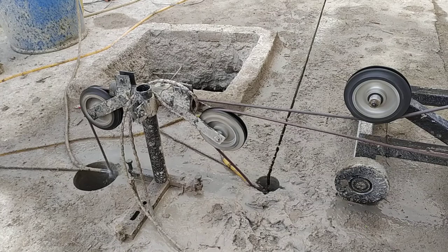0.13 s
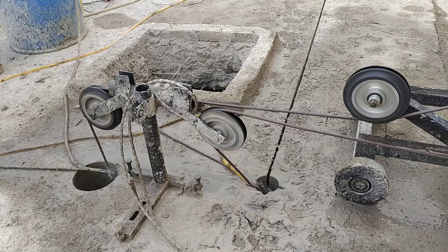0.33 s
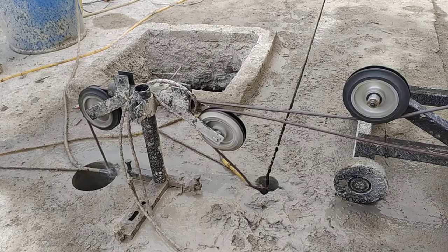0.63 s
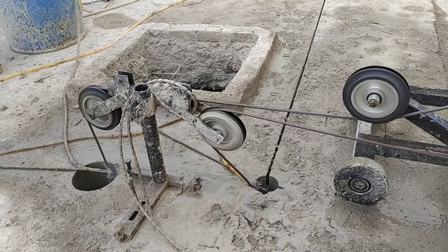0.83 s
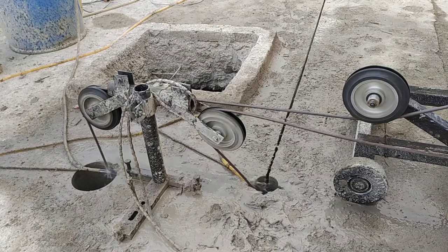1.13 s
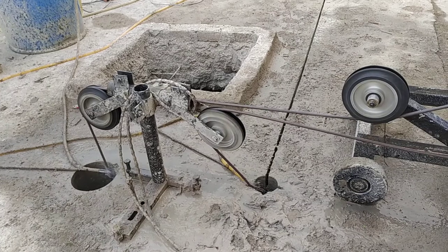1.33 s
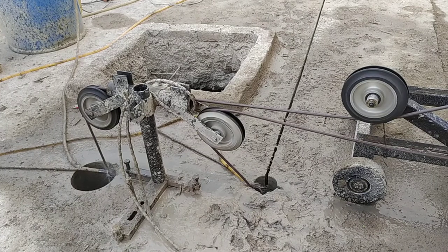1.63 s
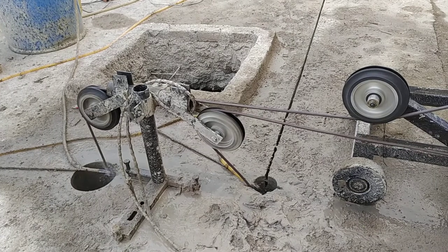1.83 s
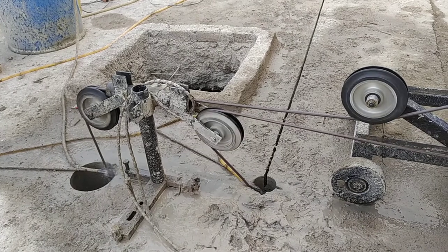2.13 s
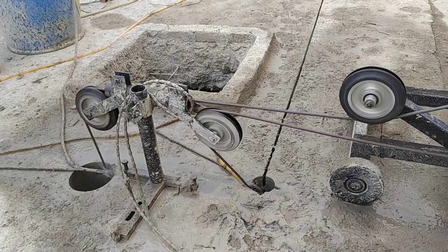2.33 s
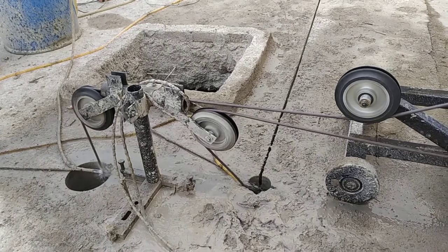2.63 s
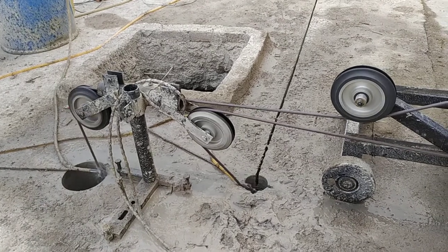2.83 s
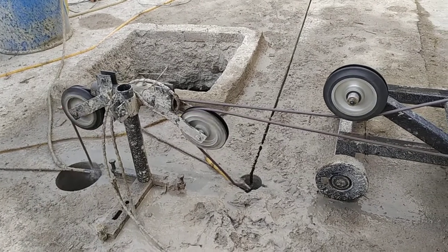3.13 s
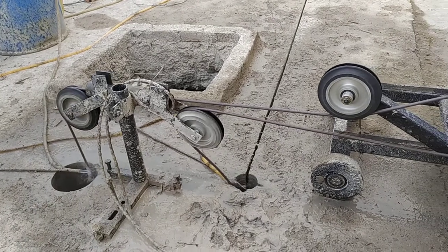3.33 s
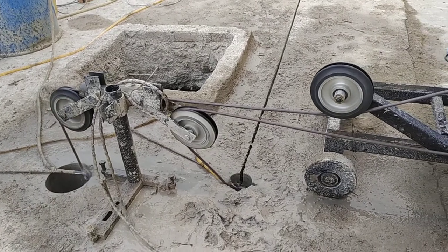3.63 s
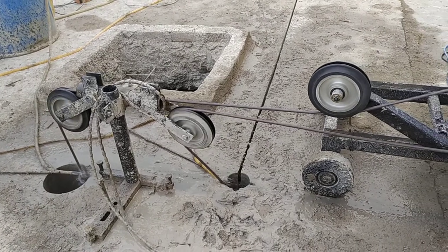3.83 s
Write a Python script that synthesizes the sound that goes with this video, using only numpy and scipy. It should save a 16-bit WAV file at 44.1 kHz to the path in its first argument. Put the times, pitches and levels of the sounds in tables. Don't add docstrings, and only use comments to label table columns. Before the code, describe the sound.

Harsh continuous concrete sawing: bright gritty wire friction, fast hollow knocking, faint whine, after brief silence.

```python
import sys
import numpy as np
from scipy import signal
from scipy.fft import rfft, irfft
from scipy.io import wavfile
from scipy.ndimage import uniform_filter1d

SR = 44100
rng = np.random.default_rng(int(sys.argv[2]) if len(sys.argv) > 2 else 0)


def to_wav(sig):
    pcm = np.clip(np.atleast_2d(sig), -1, 1) * 32767
    pcm = np.round(pcm).astype(np.int16)
    wavfile.write(sys.argv[1], SR, pcm.T)


def invert_db(level):
    return 10 ** (np.asarray(level, dtype=float) / 20)


N = 176400
T = np.arange(N) / SR
F = np.maximum(np.arange(N // 2 + 1) * SR / N, 1.)


def col(table, k):
    points = np.array(table, float)
    return np.interp(T, points[:, 0], points[:, k])


def level(x, db):
    return x * invert_db(db) / np.sqrt(np.mean(x ** 2))


def ring(x, hz, width):
    return signal.lfilter(*signal.iirpeak(hz, hz / width, fs=SR), x)


def lowpass(x, hz, order):
    return signal.lfilter(*signal.butter(order, hz, fs=SR), x)


def walk(rate):
    hold = int(SR / rate)
    steps = np.repeat(rng.standard_normal(N // hold + 1), hold)
    return 1.262 * uniform_filter1d(uniform_filter1d(steps, hold), hold)[:N]


START_S = .3765


def thump():
    since = np.clip(T - START_S, 0, 9)
    return -.09 * np.exp(-since / 0.055) * np.array([[1], [.04]])


# time in seconds, speed in turns per second.
PULLEY_SPEED = [(0, 15.14), (1.93, 15.14), (2.05, 14.7), (2.4, 14.7), (2.6, 14.87), (4, 14.87)]
# time in seconds, bite from 0 to 1.
BITE = [(0, 0), (2.0, 0), (2.1, 1), (3.7, 1), (4, .7)]


def wire_motion():
    turns = np.cumsum(col(PULLEY_SPEED, 1)) / SR
    turns = turns - np.interp(.5, T, turns)
    bead_hz = 353 * (1 - .017 * col(BITE, 1))
    return turns, 2 * np.pi * np.cumsum(bead_hz) / SR


# time in seconds, grinding level in dB.
EFFORT = [(0.4, -19), (0.97, -19.5), (0.99, -18), (1.07, -19.5), (2.0, -19.5), (2.2, -18.5), (3.72, -18.5),
          (4.0, -20)]
# frequency in Hz, level in dB per Hz.
GRIND_COLOUR = [(25, -14), (120, -12.5), (1100, -7.5), (3600, -8), (5000, -16), (9500, -3), (12400, -17.5),
                (16000, -28.5)]
# frequency in Hz, width in Hz, lift in dB.
SLAB_RINGS = [(186.7, 57, 10.5), (686, 180, 6), (2900, 1600, 2.5), (4490, 99, 7), (6020, 960, 10),
              (6390, 150, 1.5), (7360, 290, 3), (7950, 500, -0.5), (8860, 180, 2), (9590, 220, 3),
              (12750, 110, -15), (13200, 250, -6), (14000, 1500, 4)]


def grinding(bead_phase):
    grit_per_s, grit_spread_db = 2500, 1.3
    hits = rng.random(N) < grit_per_s / SR
    grit = hits * rng.standard_normal(N) * invert_db(grit_spread_db * rng.exponential(size=N))
    pressure = 1 + .06 * np.cos(bead_phase)
    raw = (rng.standard_normal(N) + level(grit, -8)) * pressure

    colour_hz, colour_db = np.array(GRIND_COLOUR).T
    db = np.interp(np.log(F), np.log(colour_hz), colour_db)
    db = db + sum(lift / (1 + (2 * (F - hz) / width) ** 2) for hz, width, lift in SLAB_RINGS)
    coloured = rfft(raw) * invert_db(db)

    out, neighbour = 0, walk(7)
    place = 3 * np.log2(F / 20)
    for band in range(30):
        neighbour = .8 * neighbour + .6 * walk(7)
        share = np.cos(np.pi / 2 * np.clip(place - band, -1, 1)) ** 2
        out = out + irfft(coloured * share, N) * invert_db(-0.1 * neighbour + 0.82 * walk(18))
    return level(out, 0) * invert_db(col(EFFORT, 1) + 4.5)


# place in the turn from 0 to 1, strength in dB, struck part of the stand in Hz.
KNOCKS = [(.02, -12, 780), (.07, 2, 540), (.11, -12, 800), (.185, 2, 820), (.25, -1, 560), (.33, -12, 700),
          (.46, -9, 720), (.62, -18, 640), (.78, 1, 730), (.83, -5, 850), (.88, -6, 560)]
# frequency in Hz, width in Hz, level in dB.
STAND_MODES = [(565.4, 28, -3), (635, 53, -6), (706, 84, -6.5), (776.3, 25.8, 3.5), (856, 39, 1),
               (880, 54, -12)]


def pulley(turns):
    scatter_db, jitter_s, width_hz = 1.5, .0004, 320
    pushes = 0
    for place, db, hz in KNOCKS:
        chance = rng.standard_normal((80, 2))
        when = np.interp(np.arange(-10, 70) + place, turns, T) + jitter_s * chance[:, 0]
        blows = np.zeros(N)
        blows[np.clip(when * SR, 0, N - 1).astype(int)] = invert_db(db + scatter_db * chance[:, 1])
        blows[[0, -1]] = 0
        pushes = pushes + ring(ring(blows, hz, width_hz), hz, width_hz)
    stand = sum(invert_db(db) * ring(pushes, hz, width) * 50 / width for hz, width, db in STAND_MODES)
    return level(stand, -21) * invert_db(-2 * col(BITE, 1))


# frequency in Hz, level in dB.
WHINE = [(3984, -45), (4016, -44.5), (4081, -47.5), (4177, -44)]


def drive():
    return sum(invert_db(db + 8.5 + 0.83 * walk(2.54)) * np.sin(2 * np.pi * hz * T) for hz, db in WHINE)


# start in seconds, length in seconds, level in dB.
HUM_BURSTS = [(0.417, 0.027, -29.5), (0.485, 0.12, -25.5), (0.665, 0.14, -31.5), (1.16, 0.12, -32.5),
              (1.354, 0.076, -24), (1.685, 0.073, -32), (1.8, 0.026, -31), (1.852, 0.11, -31),
              (2.031, 0.047, -32.5), (2.45, 0.18, -33), (2.685, 0.11, -28), (3.187, 0.13, -29),
              (3.358, 0.15, -33), (3.867, 0.1, -28.5)]
# multiple of the rate, level in dB, extra level at full bite in dB.
BEAD_ORDERS = [(2, -37, 1), (4, -36, 3), (5, -36, 2.5), (7, -32.5, 2.5), (9, -35, -1), (17, -36, 0),
               (26, -36, 1)]


def beads(bead_phase):
    flicker_db, edge_s = 2.8, 0.046

    def wavering(share, rate):
        return bead_phase + 2 * np.pi * np.cumsum(350 * share * walk(rate)) / SR

    hum = invert_db(-34.5)
    for start, length, db in HUM_BURSTS:
        to_edge = np.minimum(T - start, start + length - T)
        hum = hum + invert_db(db + 2) * np.clip(to_edge / edge_s + .5, 0, 1)
    out = hum * invert_db(flicker_db * walk(24.93)) * np.sin(wavering(.011, 20))

    bite_swing = 2 * col(BITE, 1) - 1
    for order, db, bite_db in BEAD_ORDERS:
        patches_db = db + bite_db * bite_swing + 2 * walk(5.7) + flicker_db * walk(40.44)
        out = out + invert_db(patches_db) * np.sin(order * wavering(.012, 90))
    return out


# start in seconds, length in seconds, level in dB, centre in Hz.
CATCHES = [
    (.990, 0.012, -14.5, 6600),
    (.992, .004, -17, 3120),
    (2.641, 0.011, -18, 2900),
    (2.641, .01, -20, 4450),
    (2.774, 0.016, -17, 6300),
    (.846, 0.01, -19, 3100),
    (0.82, 0.011, -21, 6600),
]


def catches():
    out = np.zeros(N)
    for start, length, db, hz in CATCHES:
        u = (T - start) / length
        shape = np.clip(u * 8, 0, 1) * np.exp(-np.clip(u - 1, 0, 50) * 1.7)
        out += level(ring(rng.standard_normal(N), hz, hz * 0.07), db) * shape
    return out


def handling_rumble():
    return level(lowpass(rng.standard_normal(N), 8.9, order=1), -59.5)


def blocked_port(saw, rumble):
    hiss = level(lowpass(rng.standard_normal(N), 2800, order=4), -96)
    return invert_db(-49) * lowpass(saw, 905, order=2) + lowpass(rumble, 1500, order=2) + hiss


# frequency in Hz, share of moments a narrow band drops out.
DROPOUTS = [(4600, 0), (5100, .15), (5500, 0), (11600, 0), (12500, .45), (13700, .3), (14700, .45),
            (15200, .85)]


def starve(x):
    hz, _, z = signal.stft(x, SR, nperseg=2048)
    chance = rng.random((210, z.shape[-1] // 2 + 1))
    chance[141:] = chance[141]
    chance = np.repeat(np.repeat(chance, 5, axis=0), 2, axis=1)
    keep = chance[:len(hz), :z.shape[-1]] > np.interp(hz, *np.array(DROPOUTS).T)[:, None]
    return signal.istft(z * np.maximum(keep, .003), SR, nperseg=2048)[1][:, :N]


def scene():
    turns, bead_phase = wire_motion()
    saw = grinding(bead_phase) + pulley(turns) + drive() + beads(bead_phase) + catches()
    rumble = handling_rumble()
    open_port = saw + invert_db(10) * np.roll(rumble, 9000)
    return np.array([open_port, blocked_port(saw, rumble)])


def low_pass(x):
    return signal.sosfilt(signal.butter(12, 15750, fs=SR, output="sos"), x)


def record(dry):
    limited = np.tanh((dry + thump()) * 1.25) / 1.25
    opening = np.clip((T - START_S) / .003, 0, 1)
    return low_pass(starve(limited) * opening)


dry = scene()
out = record(dry)
to_wav(out)
```